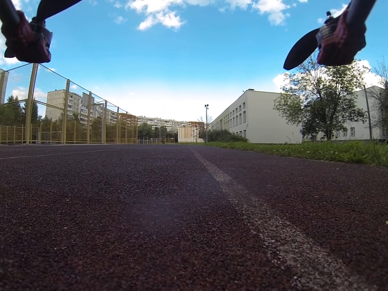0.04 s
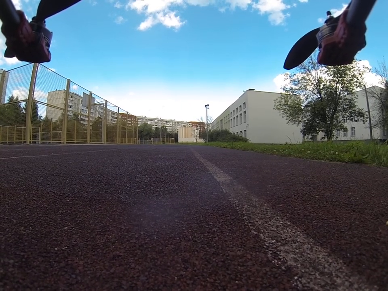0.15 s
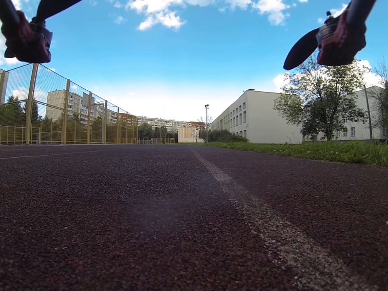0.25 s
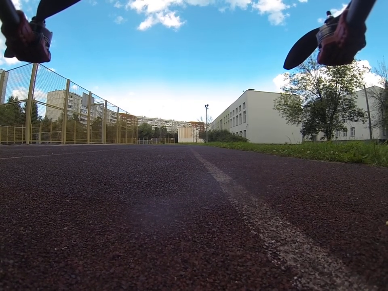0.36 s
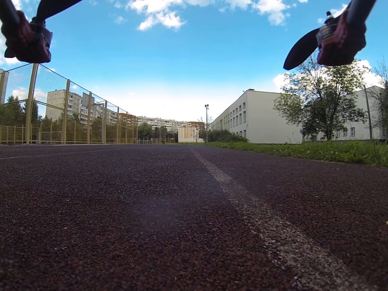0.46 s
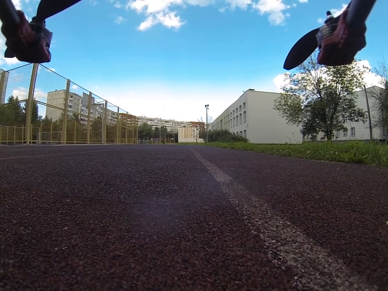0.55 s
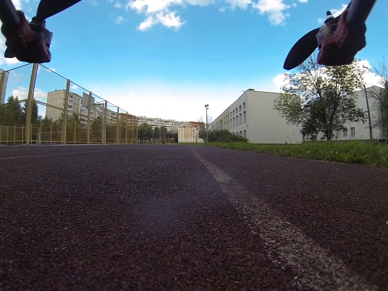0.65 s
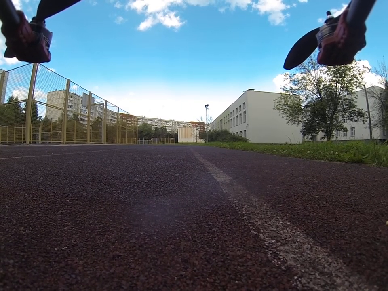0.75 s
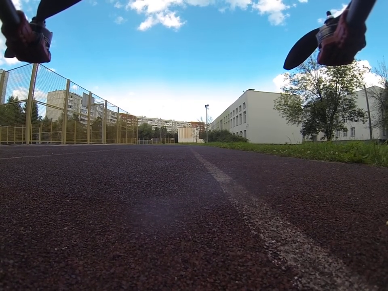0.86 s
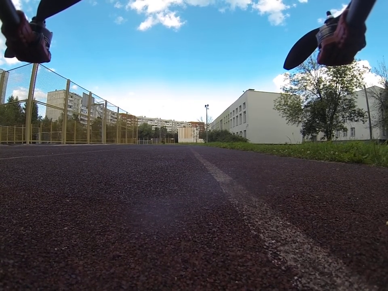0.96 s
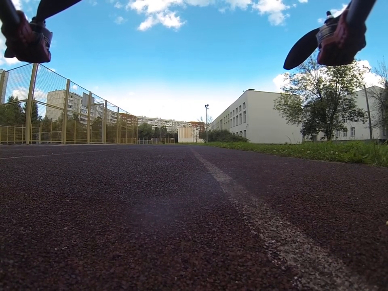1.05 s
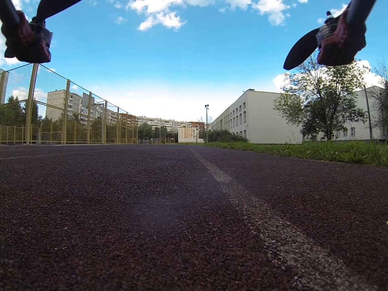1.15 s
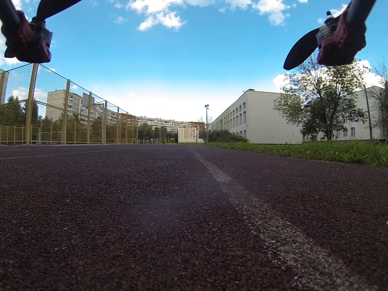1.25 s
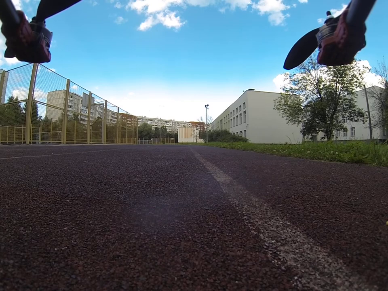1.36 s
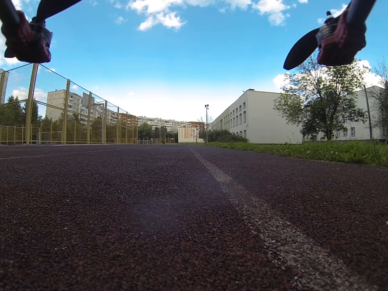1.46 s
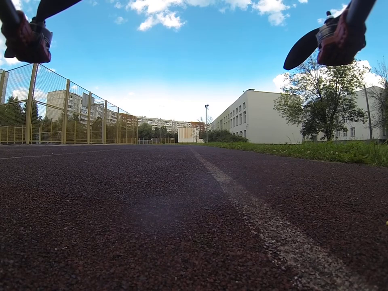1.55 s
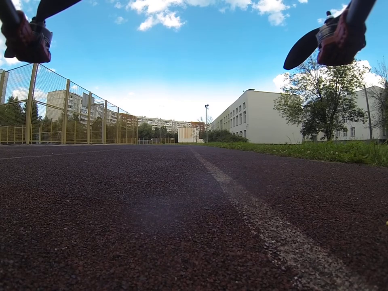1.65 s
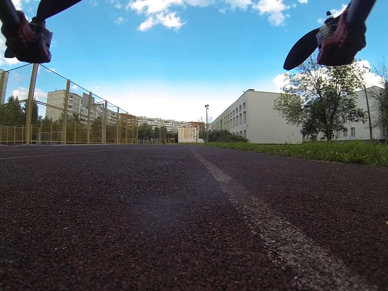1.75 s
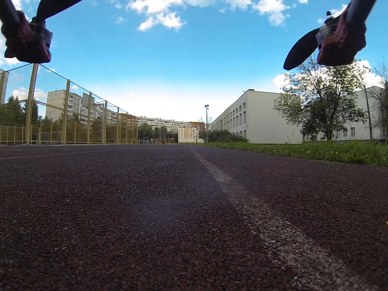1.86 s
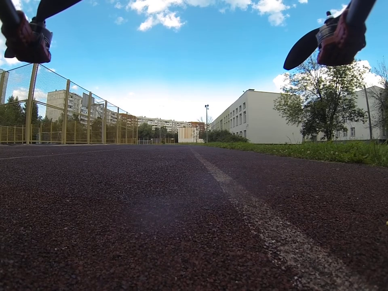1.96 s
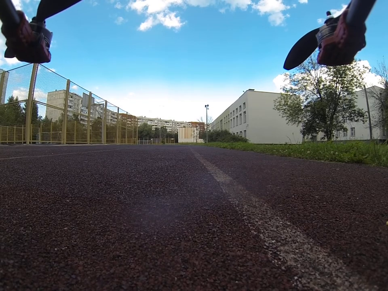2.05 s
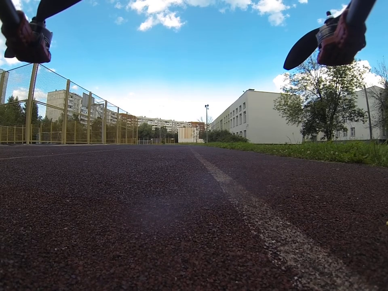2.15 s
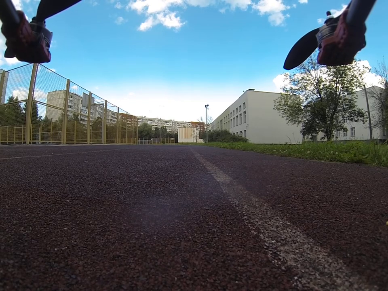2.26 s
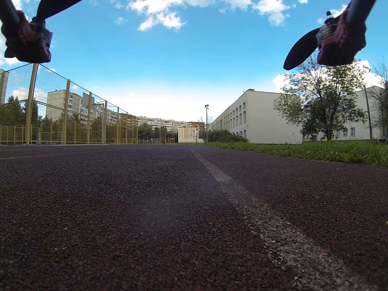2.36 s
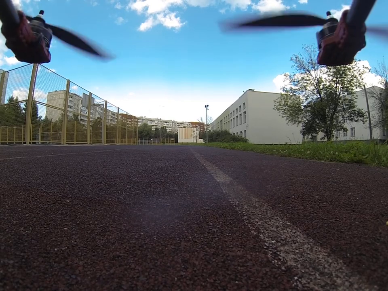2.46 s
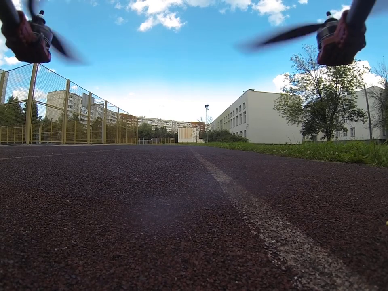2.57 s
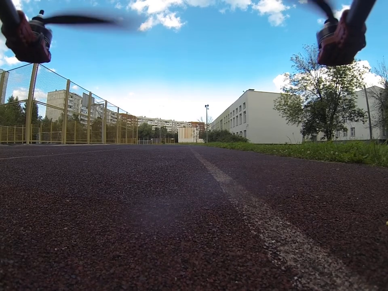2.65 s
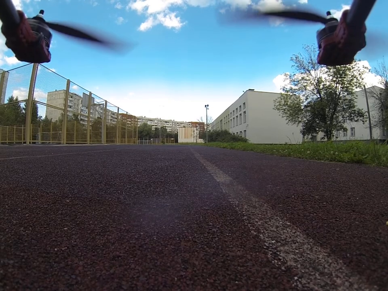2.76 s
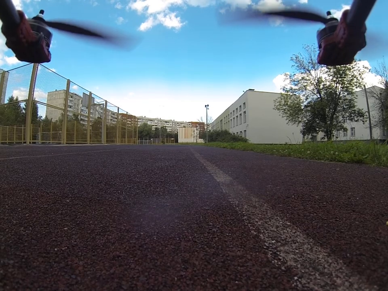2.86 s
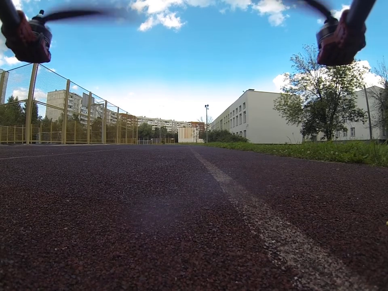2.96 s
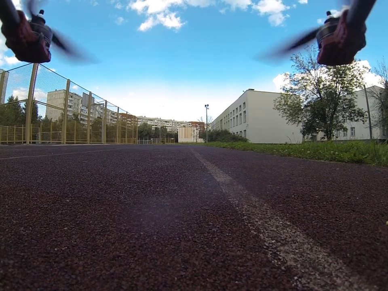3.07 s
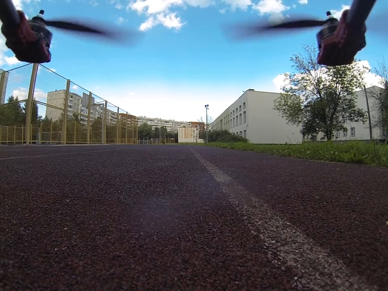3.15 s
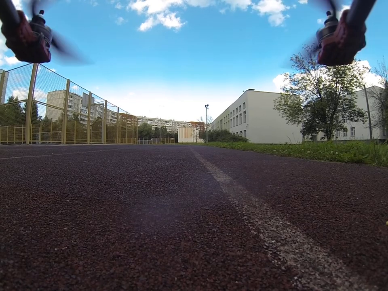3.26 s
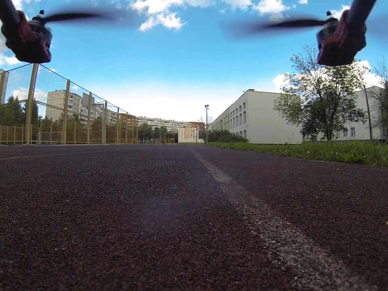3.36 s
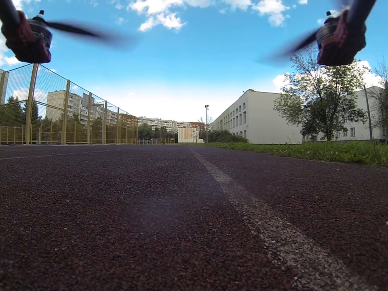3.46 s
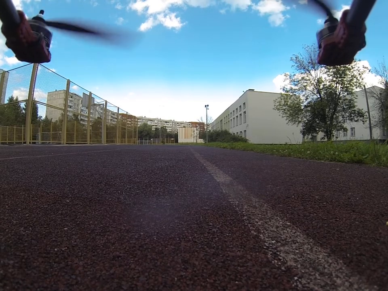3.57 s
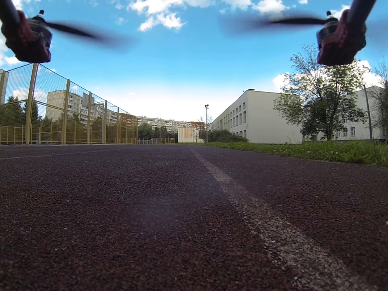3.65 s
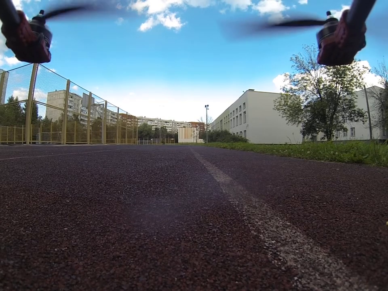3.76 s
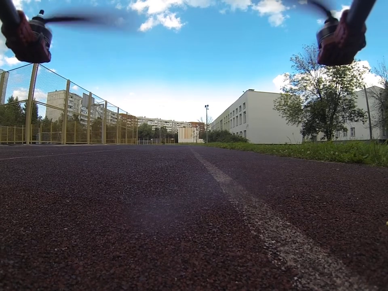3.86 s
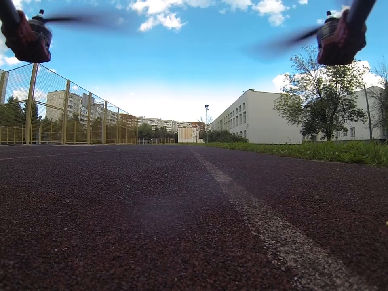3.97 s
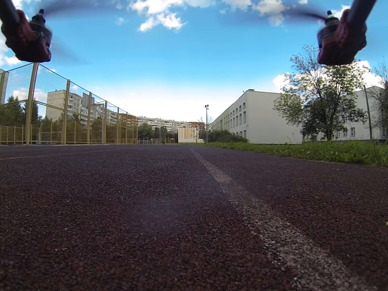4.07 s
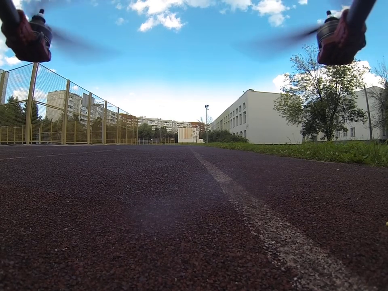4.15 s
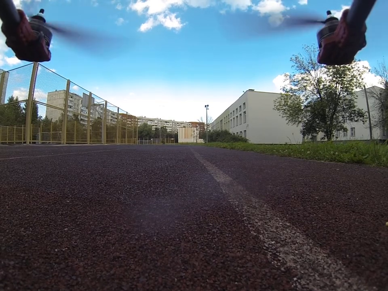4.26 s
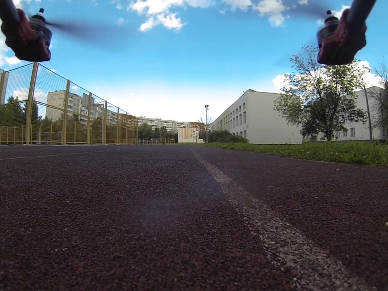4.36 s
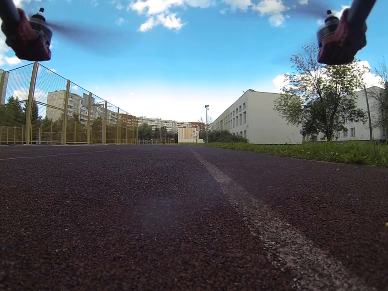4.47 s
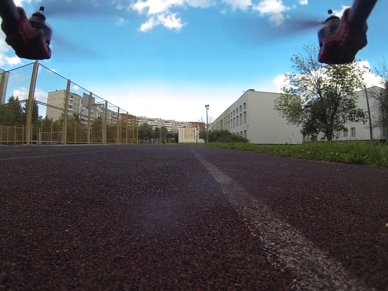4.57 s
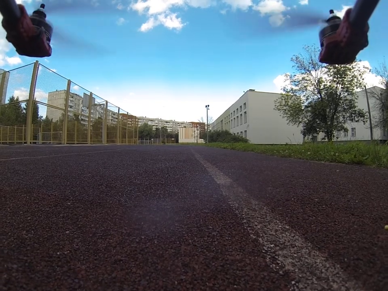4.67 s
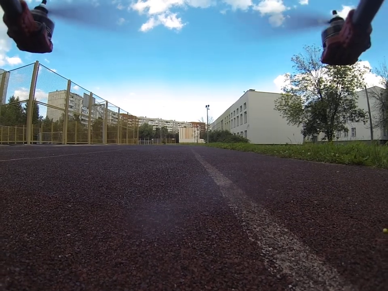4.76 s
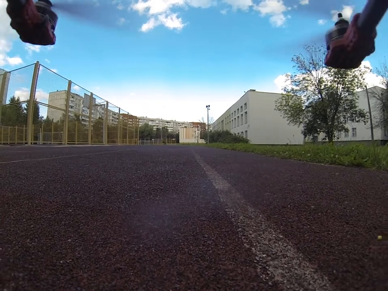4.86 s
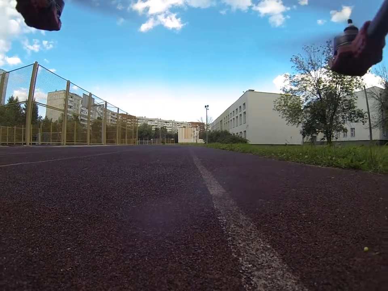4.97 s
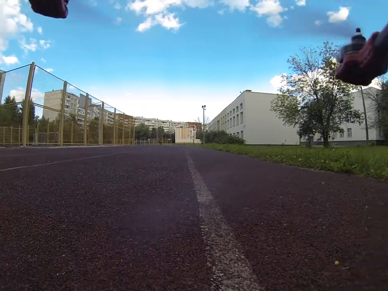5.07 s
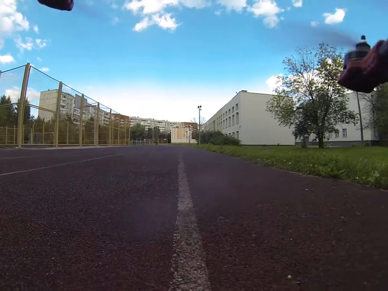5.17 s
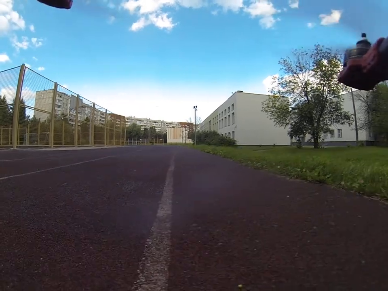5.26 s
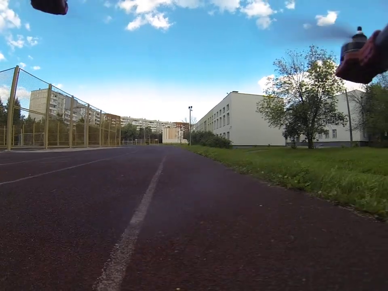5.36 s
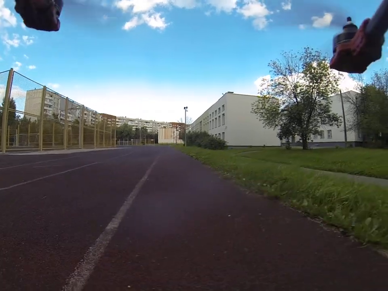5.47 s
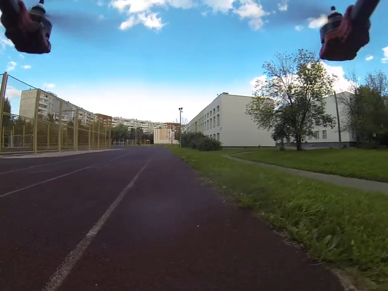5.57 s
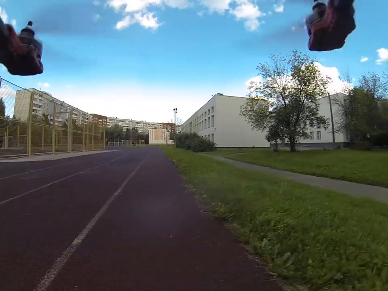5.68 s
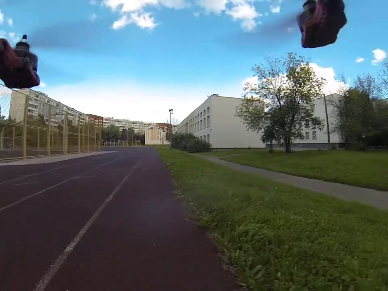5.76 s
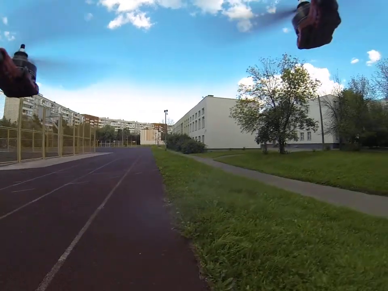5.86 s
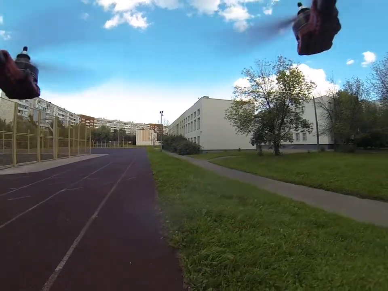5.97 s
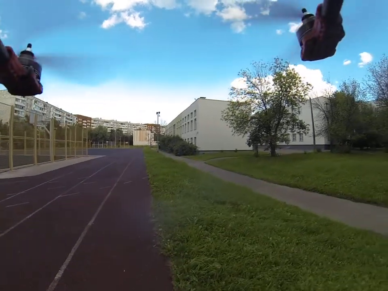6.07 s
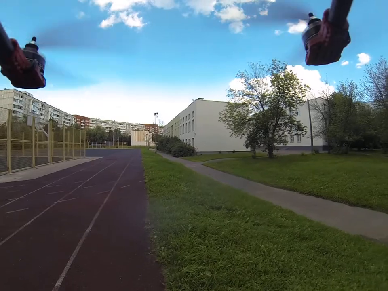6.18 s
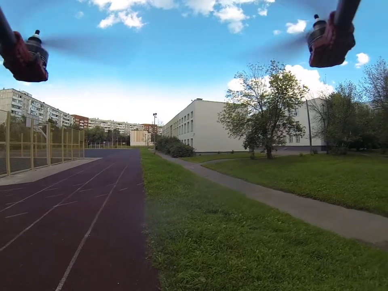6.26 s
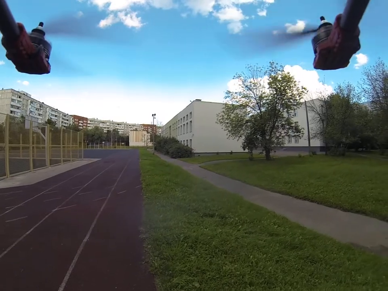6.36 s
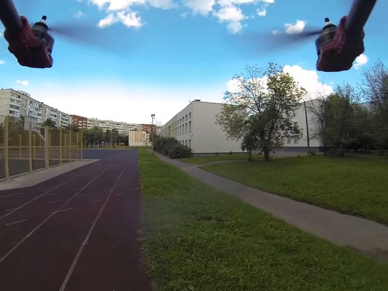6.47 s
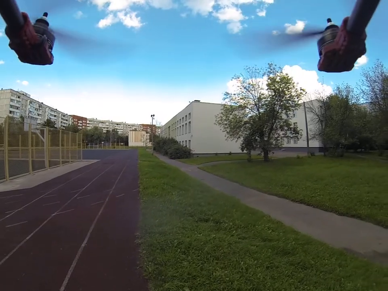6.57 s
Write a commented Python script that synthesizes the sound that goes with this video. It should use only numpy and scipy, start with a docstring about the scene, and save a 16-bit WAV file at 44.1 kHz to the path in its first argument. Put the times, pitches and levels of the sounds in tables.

```python
"""Motors jerk into life, whine at idle, glide upward and settle into a blade hum under a wide hiss.
A camera hangs under a six-rotor drone in a quiet town: the three loudest motors are sums of sines locked
to their shaft speeds, with filtered noise for bearings, spool-up and airflow. Downwash thrown back by the
ground is gusty rumble, flutter and slaps on the microphone, much of it fading as the drone lifts clear.
Steady town noise, thin pulsing electronic tones and a few dry rustles lie beneath."""
import sys
import numpy as np
from scipy import signal
from scipy.fft import rfft, irfft, next_fast_len
from scipy.io import wavfile
from scipy.ndimage import uniform_filter1d

SR = 44100
rng = np.random.default_rng(int(sys.argv[2]) if len(sys.argv) > 2 else 0)


def materialize(psi):
    """Save the field psi as 16-bit PCM at rate SR to the path in sys.argv[1].

    A 1-D psi becomes a single channel; in a 2-D psi each row is a channel.
    """
    bounded = np.clip(np.atleast_2d(psi).T, -1, 1)
    quanta = np.round(bounded * 32767).astype(np.int16)
    wavfile.write(sys.argv[1], SR, quanta)


N = 291942
T = np.arange(N) / SR
END_S = 7  # later than the last sample: a sound that lasts to the end
EDGE_HZ = 15220  # upper band limit


def gain_of(db):
    """Logarithmic level: 20 dB is a tenfold amplitude."""
    return np.exp(np.asarray(db) * (np.log(10) / 20))


def evened(x):
    """Power normalisation: scales a signal to rms 1."""
    return x / np.sqrt(np.mean(x ** 2) + 1e-20)


def read(points, hz):
    """Spectral envelope: interpolates a table's dB along log frequency."""
    f, value = np.transpose(points)
    return np.interp(np.log(hz + 1), np.log(f + 1), value)


def columns(rows):
    """Piecewise linear envelope: each column of a time table at every sample."""
    s, *rest = np.transpose(rows)
    return [np.interp(T, s, c) for c in rest]


def glides(rows):
    """Smooth envelope: each column as a cubic with continuous slope through its points."""
    s, *rest = np.transpose(rows)
    at = np.clip(np.searchsorted(s, T) - 1, 0, len(s) - 2)
    span = np.diff(s)[at]
    u = np.clip((T - s[at]) / span, 0, 1)
    ease = u * u * (3 - 2 * u)
    slopes = np.gradient(rest, s, axis=1)
    curves = []
    for c, m in zip(rest, slopes):
        bend = span * u * (1 - u) * ((1 - u) * m[at] - u * m[at + 1])
        curves.append(c[at] + ease * np.diff(c)[at] + bend)
    return curves


def during(t0, t1, fade=0.0017):
    """Gating: 1 between two times, 0 outside, with linear fades in seconds."""
    return np.clip(np.minimum(T - t0, t1 - T) / fade, 0, 1)


def colour(x, points):
    """Linear filtering: shapes the spectrum of x, keeping white noise near its rms."""
    size = next_fast_len(N)
    response = evened(gain_of(read(points, np.fft.rfftfreq(size, 1 / SR))))
    return irfft(rfft(x, size) * response, size)[:N]


def noise(points):
    """Coloured noise: a random signal with the given spectrum."""
    return colour(rng.standard_normal(N), points)


def wander(seconds, size=16):
    """Slow random modulation of rms 1: twice-smoothed noise, drawn once every size samples."""
    width = max(int(seconds * SR / size), 2)
    slow = uniform_filter1d(uniform_filter1d(rng.standard_normal(N // size + 2), width), width)
    return np.interp(np.arange(N) / size, np.arange(len(slow)), evened(slow))


# Far traffic and hiss. Each row: frequency in Hz, relative density in dB per Hz.
TOWN_SPECTRUM = [(8.8, -32), (15, -10.5), (66, -4.5), (95, -10.5), (208, -20), (270, -23), (295, -23.5),
                 (429, -28), (468, -23.5), (557, -30), (884, -27), (1400, -38.5), (1620, -43.5),
                 (1820, -47.5), (15000, -69)]
TOWN_DB = -36.5


def town():
    """Diffuse sound field: many far sources merge into steady coloured noise."""
    return gain_of(TOWN_DB) * noise(TOWN_SPECTRUM)


# Thin tones of the electronics. Each row: frequency in Hz, rms level before the pulsing in dB.
FAINT_TONES = [(5572, -87), (6428, -86), (12882, -84)]


def electronics():
    """Amplitude modulation: steady sines share one periodic pulse."""
    tones = sum(np.sqrt(2) * gain_of(db) * np.sin(2 * np.pi * hz * T) for hz, db in FAINT_TONES)
    pulse_hz = 47.9
    return tones * (1 + np.sin(2 * np.pi * pulse_hz * T))


# Faint dry rustles nearby. Each row: start in seconds, length in seconds, relative level in dB.
RUSTLE_TIMES = [(0.306, 0.021, -63), (1.089, 0.031, -59), (1.445, 0.085, -53), (1.676, 0.089, -56),
                (1.751, 0.047, -49), (2.145, 0.048, -57.5)]
# Their spectrum. Each row: frequency in Hz, relative density in dB per Hz.
RUSTLE_SPECTRUM = [(880, -2), (1500, -3), (3710, -12), (4860, -20), (5620, -13), (6820, -16.5),
                   (11300, -20), (15000, -24)]


def rustles():
    """Friction noise: short rough bursts, each swelling toward its end."""
    envelope = np.zeros(N)
    for s, length, db in RUSTLE_TIMES:
        swell = np.clip(0.73 + 0.81 * (T - s) / length, 0, 2)
        envelope += gain_of(db) * during(s, s + length, fade=0.0051) * swell
    return envelope * gain_of(3.0 * wander(0.0026)) * noise(RUSTLE_SPECTRUM)


# Gusts that buffet the microphone. Each row: centre in seconds, rumble level in dB,
# reach to either side in seconds.
GUST_TIMES = [(2.654, -12.5, 0.1), (2.734, -13.5, 0.14), (2.967, -12, 0.14), (3.191, -11, 0.05),
              (3.55, -9, 0.073), (3.615, -6, 0.051), (3.72, -15, 0.06), (4.34, -20, .11),
              (4.536, -4.5, 0.049), (4.648, -13, 0.092), (4.774, -14, 0.053), (4.877, -13, 0.072),
              (5.015, -7.5, 0.057)]


def gust_power():
    """Energy addition: gusts of raised-cosine amplitude add as powers."""
    power = np.zeros(N)
    for s, db, reach in GUST_TIMES:
        bump = np.cos(np.pi * np.clip((T - s) / reach, -1, 1) / 2) ** 2
        power += (gain_of(db) * bump) ** 2
    return power


# Eddies that slap the microphone port. Each row: start in seconds, relative level in dB,
# sharpness as relative treble level in dB.
SLAP_TIMES = [(2.602, -19.5, -34), (2.634, -11, -33), (2.667, -14, -38), (2.681, -13.5, -33),
              (2.699, -11, -32), (2.708, -12, -34), (2.775, -18.5, -31), (2.905, -15.5, -30),
              (2.917, -13, -31), (2.974, -15, -36), (3.023, -6, -28), (3.189, -22, -43), (3.245, -18, -47),
              (3.339, -25.5, -33), (3.545, -6.5, -22), (3.582, -9, -24), (3.593, -19, -9),
              (3.626, -17, -19), (3.639, -18.5, -8), (3.68, -9.5, -30), (3.709, -15, -14),
              (3.781, -18, -15), (3.806, -21, -12), (3.831, -15.5, -10.5), (3.847, -13.5, -15),
              (3.894, -18.5, -19), (3.917, -9, -20), (3.934, -9.5, -14), (3.988, -13, -11),
              (4.011, -14, -18), (4.042, -24, -26), (4.126, -11, -15.5), (4.138, -8.5, -15),
              (4.17, -15.5, -6), (4.202, -10, -3.5), (4.237, -21.5, -2), (4.276, -12.5, -5),
              (4.296, -13, -10), (4.447, -16.5, -13.5), (4.51, -16, -10.5), (4.517, -7.5, -11),
              (4.611, -18, -0.5), (4.65, -16.5, -11), (4.672, -13.5, -12.5), (4.704, -15.5, -15),
              (4.778, -13.5, -6.5), (4.79, -17, -17), (4.894, -20.5, -12), (4.928, -11.5, -9.5),
              (4.955, -13, -2.5), (4.991, -21, -19), (5.016, -12.5, -8), (5.062, -27, -1.5),
              (5.16, -21.5, -12)]
# Bass part of a slap. Each row: frequency in Hz, relative density in dB per Hz.
SLAP_BODY_SPECTRUM = [(30, 1.5), (150, 6), (400, -3), (800, -15), (1400, -53), (3000, -87)]
# Treble part of a slap. Each row: frequency in Hz, relative density in dB per Hz.
SLAP_EDGE_SPECTRUM = [(400, -37), (900, 1), (1800, -6.5), (3200, -18), (4500, -26.5), (7000, -60)]
SLAP_RISE_S = 0.0027


def slaps():
    """Impulsive turbulence: jagged pressure puffs drive a bass and a treble filter."""
    body, edge = np.zeros(N), np.zeros(N)
    # a few sudden steps in each slap
    jolts = evened(rng.standard_normal(N) * gain_of(3.5 * wander(0.00072, size=1)))
    u = T[:2000] / SLAP_RISE_S
    shape = (u * np.exp(1 - u)) ** 2.66
    for s, db, sharp_db in SLAP_TIMES:
        at = slice(round(s * SR), round(s * SR) + len(u))
        puff = shape * jolts[at]
        puff = gain_of(db) * puff * np.linalg.norm(shape) / np.linalg.norm(puff)
        body[at] += puff
        edge[at] += puff * gain_of(sharp_db)
    return gain_of(6.5) * colour(body, SLAP_BODY_SPECTRUM) + gain_of(1.0) * colour(edge, SLAP_EDGE_SPECTRUM)


# Downwash between gusts. Each row: time in seconds, relative rumble level in dB,
# flutter level in dB relative to the rumble.
WASH_LEVELS = [(2.3, -41, 3), (2.38, -37, -26), (2.54, -22.5, -28), (2.85, -16.5, -11), (3.02, -20.5, -9),
               (3.1, -24, -10), (3.48, -21, -4.5), (3.8, -12.5, -3.5), (4.2, -15, -9), (4.7, -21.5, -7),
               (5.05, -20.5, -6), (5.34, -19.5, -2.5), (5.75, -16.5, -19), (6.62, -16, -25)]
# Fading as the ground falls away: start in seconds, end in seconds, change of the rumble in dB.
LIFT_OFF = (4.56, 5.5, -10.5)
# Rumble spectrum. Each row: frequency in Hz, relative density in dB per Hz.
RUMBLE_SPECTRUM = [(8.8, -50), (15, 3), (57, 2.5), (260, -20.5), (340, -28), (570, -120)]
# Flutter spectrum. Each row: frequency in Hz, relative density in dB per Hz.
FLUTTER_SPECTRUM = [(60, -4.5), (120, -8.5), (310, -8), (600, -22), (1000, -59.5), (2000, -41), (4000, -81)]
# Sharper part of the flutter. Each row: frequency in Hz, relative density in dB per Hz.
CRACKLE_SPECTRUM = [(300, -7), (700, 0.5), (1300, -7), (2500, -19.5), (4500, -61)]
GUST_FLUTTER_DB = -12.5  # against the gust rumble


def downwash():
    """Wind noise: turbulence makes gusty rumble and clumped flutter, sharper at high rotor speed."""
    rumble_db, flutter_db = columns(WASH_LEVELS)
    gusts = gust_power()
    t0, t1, db = LIFT_OFF
    near_db = db * np.clip((T - t0) / (t1 - t0), 0, 1)

    rumble = evened(colour(rng.standard_normal(N) * gain_of(3.4 * wander(0.016)), RUMBLE_SPECTRUM))
    rumble *= gain_of(near_db) * np.sqrt(gain_of(rumble_db) ** 2 + gusts)

    lumpy_db = 5.64 * np.clip(1.5 + 0.073 * near_db, 0, 1)  # the flutter evens out away from the ground
    power_offset = lumpy_db * np.log(10) / 20  # keeps the mean power of the clumps about the same
    clumps = rng.standard_normal(N) * gain_of(lumpy_db * (wander(0.003) - power_offset))
    flutter_power = gain_of(rumble_db + flutter_db) ** 2 + gusts * gain_of(GUST_FLUTTER_DB) ** 2
    clumps *= gain_of(0.55 * near_db - 4.0) * np.sqrt(flutter_power)

    octaves = np.log2(columns(MOTOR_SPEEDS)[1] / 4000)  # second motor's whine
    sharp = gain_of(-8.0 + 0.14 * near_db + 13.6 * octaves)
    out = rumble + colour(clumps, FLUTTER_SPECTRUM) + colour(clumps * sharp, CRACKLE_SPECTRUM)
    return (out + slaps()) * during(WASH_LEVELS[0][0], END_S, fade=0.036)


# Motor and blade hiss following the throttle. Each row: time in seconds, relative level in dB.
HISS_LEVELS = [(2.32, -34), (2.35, -29.5), (2.43, -40), (2.65, -39.5), (2.81, -43.5), (3.0, -44.5),
               (3.7, -43), (3.9, -37), (4.13, -41), (4.39, -47), (4.51, -38.5), (4.94, -43.5), (5.31, -37),
               (6.43, -36), (6.62, -31)]
# Sudden drops of the hiss. Each row: start in seconds, depth in dB, recovery in seconds.
HISS_DIPS = [(3.006, 7.5, 0.43), (3.91, 5, 0.072), (4.01, 5.5, 0.17), (4.145, 9.5, 0.23), (4.54, 7.5, 0.42),
             (4.685, 4, 0.073), (4.785, 5.5, 0.084), (5.034, 10, 0.22)]
DIP_FALL_S = 0.01


def hiss_level():
    """Level envelope: the throttle curve in dB, with sudden dips that creep back."""
    dips = np.zeros(N)
    for s, db, back in HISS_DIPS:
        dips += db * during(s, END_S, DIP_FALL_S) * np.clip(1 - (T - s) / back, 0, 1)
    return columns(HISS_LEVELS)[0] - dips


# Bearings and windings at low speed. Each row: frequency in Hz, relative density in dB per Hz.
IDLE_SPECTRUM = [(500, 1.5), (1100, -9.5), (1700, 1.5), (2500, -4), (3500, -2.5), (4400, -0.5), (5100, -14),
                 (6500, -7.5), (8000, -12), (9300, -19), (10000, -15.5), (10500, -12), (12300, -9.5),
                 (13600, -17), (15300, -23)]
# Duller hiss under load near the ground. Each row: frequency in Hz, relative density in dB per Hz.
SPOOL_SPECTRUM = [(880, -1), (1500, -2), (2080, -7), (3860, -11.5), (4550, -12.5), (8190, -20),
                  (12400, -22), (15000, -31)]
# Blade tips and wake. Each row: frequency in Hz, relative density in dB per Hz.
AIRFLOW_SPECTRUM = [(240, -5), (400, -22), (432, 1), (593, -5), (712, -1.5), (1270, 0.5), (2090, -3.5),
                    (2880, -2.5), (3250, -5), (4330, -4.5), (8840, -8), (12200, -7.5), (15000, -15)]


def rotor_hiss(hiss_db, throb):
    """Broadband rotor noise: bearing hiss yields to airflow, both throbbing with the passing blades."""
    load = np.clip((columns(MOTOR_SPEEDS)[1] - 2600) / 1200, 0, 1)  # from the second motor's whine
    airflow = np.clip((T - 4.9) / 0.58, 0, 1)  # clean air reaches the blades as the craft rises
    idle = gain_of(1.0 + 0.18 * throb) * noise(IDLE_SPECTRUM)
    air = gain_of(3.0 + 0.87 * throb) * noise(AIRFLOW_SPECTRUM)
    spool = gain_of(5.5) * noise(SPOOL_SPECTRUM)
    # square roots keep the power even across each blend
    near_ground = np.sqrt(1 - load) * idle + np.sqrt(load) * spool
    hiss = np.sqrt(1 - airflow) * near_ground + np.sqrt(airflow) * air
    gate = during(FIRST_JERK[0] - 0.008, END_S, fade=0.0046)
    return gain_of(hiss_db + 1.1 * wander(0.0025)) * hiss * gate


# Rattle of arms and motor bells. Each row: frequency in Hz, relative density in dB per Hz.
ARM_SPECTRUM = [(500, -24), (1100, -22), (1650, -7.5), (2500, -37), (3400, -3), (4400, -12), (5100, -27.5),
                (6500, -19.5), (8000, -45), (9500, -70), (10500, -51), (12000, -61), (13500, -50),
                (15300, -43)]
# First jerk of the rotors: start in seconds, level in dB, time to decay by 60 dB in seconds.
FIRST_JERK = (2.311, -20, 0.029)
# A later swell of the rattle: three times in seconds and a relative peak level in dB; the times are out of
# order, so the swell stays silent.
RATTLE_GATE = (2.5, 2.365, 2.5, -30)


def start_rattle():
    """Structural excitation: one rattling noise rings down exponentially after the first jerk; the later swell
    stays silent."""
    rattle = noise(ARM_SPECTRUM)
    s, db, t60 = FIRST_JERK
    jerk = gain_of(db - 60 * np.maximum(T - s, 0) / t60) * during(s, END_S, fade=0.0011)
    swell = np.interp(T, RATTLE_GATE[:3], [0, 1, 0]) ** 2
    grind = gain_of(RATTLE_GATE[3] + 1.4 * wander(0.0048)) * swell
    return rattle * (jerk + grind)


def start_tone():
    """Electromagnetic excitation: windings sing while the rotors are pulled into step."""
    level = np.sqrt(2) * gain_of(-37.5 + 2 * wander(0.0043))
    return level * np.sin(2 * np.pi * 9154 * T) * during(2.311, 2.422)


def ringing(hz, arms, bells, size=32):
    """Resonance: how much arms and motor bells lift a gliding tone, in dB."""
    slow = abs(hz[::size])
    lift_db = arms * read(ARM_SPECTRUM, slow) + bells * read(IDLE_SPECTRUM, slow)
    return np.repeat(lift_db, size)[:N]


# Magnet and slot tones in the order of SLOT_ORDERS. Each row: relative level at idle in dB,
# relative level in flight in dB, both against the hiss.
SLOT_LEVELS = [(-19, 0.5), (-23, 4), (-7.5, -5), (-9, -26), (-6.5, 5.5), (0, 15), (-28, 7), (-7.5, -17),
               (-6, -14), (-7, -22), (-5.5, -26), (-6, -22), (-3, -16), (0, -11)]
# Their multiples of the shaft speed, one number each.
SLOT_ORDERS = [24, 36, 48, 54, 108, 144, 168, 180, 216, 252, 288, 324, 360, 396]
# Whine folded down from the switching frequency. Each row: multiple of the whine,
# relative level against the hiss in dB.
FOLDED_WHINES = [(1, -21), (2, -23), (3, -24)]
SWITCH_HZ = 16640  # the speed controllers chop the current at this rate
WHINE_ORDER = 72  # magnet whine per shaft turn


def motor(whine_hz, whine_db, beat_db, blades, near, hiss_db):
    """Harmonic synthesis: sines on multiples of shaft speed; the high ones waver and ring in the arms."""
    near_idle_db, near_flight_db, near_fold_db = near
    turn = 2 * np.pi * np.cumsum(whine_hz / WHINE_ORDER) / SR  # shaft angle in radians
    load = np.clip((whine_hz - 2200) / 2500, 0, 1)

    level_db = hiss_db + whine_db + 0.5 + ringing(whine_hz, 0.15, 0.25)
    out = gain_of(level_db + 1.8 * wander(0.012)) * np.sin(WHINE_ORDER * turn + 0.4 * wander(0.006))

    for k, db in blades:
        level = gain_of(beat_db + db + wander(0.03)) * during(BLADE_LEVELS[0][0], END_S, fade=0.3)
        out += level * np.sin(k * turn + 2 * np.pi * rng.random())

    for k, (idle_db, flight_db) in zip(SLOT_ORDERS, SLOT_LEVELS):
        hz = k * whine_hz / WHINE_ORDER
        own_db = (1 - load) * (idle_db + near_idle_db) + load * (flight_db + near_flight_db)
        level_db = hiss_db + own_db + 1.0 + ringing(hz, 0.51, 0.47) + 2 * wander(0.012)
        level = (hz < EDGE_HZ) * gain_of(level_db)
        out += level * np.sin(k * turn + 0.4 * wander(0.008))

    for k, db in FOLDED_WHINES:
        ring_db = ringing(SWITCH_HZ - k * whine_hz, 0, 0.94)
        level_db = hiss_db + db + near_fold_db + 7.5 + ring_db - 23 * load + 2.1 * wander(0.03)
        phase = 2 * np.pi * SWITCH_HZ * T - k * WHINE_ORDER * turn
        out += gain_of(level_db) * np.sin(phase + 0.6 * wander(0.004))
    return np.sqrt(2) * out * during(MOTOR_SPEEDS[0][0], END_S, fade=0.05), turn


# The three loudest motors. Each row: time in seconds, then the magnet whine of each motor in Hz,
# which is 72 times its shaft speed.
MOTOR_SPEEDS = [(2.345, 680, 660, 640), (2.39, 1060, 1040, 1015), (2.43, 1295, 1280, 1260),
                (2.5, 1468, 1461, 1456), (2.63, 1650, 1642, 1637), (2.82, 1803, 1812, 1789),
                (3.1, 1913, 1913, 1890), (3.3, 1960, 1965, 1936), (3.6, 2037, 2170, 2012),
                (3.72, 2128, 2305, 2115), (3.8, 2305, 2569, 2355), (3.95, 2753, 3197, 2931),
                (4.22, 3427, 4120, 3778), (4.42, 3871, 4627, 4158), (4.62, 4192, 4993, 4541),
                (4.82, 4745, 5272, 4951), (4.92, 5193, 5375, 5157), (5.12, 5604, 5404, 5567),
                (5.37, 6077, 5260, 5998), (5.62, 6375, 4846, 5949), (5.82, 6235, 4472, 5693),
                (6.12, 5571, 4053, 5301), (6.32, 5125, 3802, 5105), (6.42, 5077, 3790, 5086),
                (6.62, 5149, 3896, 5122)]
# Each row: time in seconds, then the relative whine level of each motor against the hiss in dB.
WHINE_LEVELS = [(2.4, -6, -20, -18), (2.65, 2.5, -23, 5), (2.95, 1, -15, -2.5), (3.3, -2.5, -4, 1),
                (3.52, 6, -3, -15), (3.8, -2, -2.5, -21), (4.0, -12, 4.5, 0), (4.36, -1, 5.5, -6),
                (4.6, -13, -16, -13), (5.06, -9, -13, -26), (5.6, -1, -19, -9), (6.1, -1, -12.5, -8),
                (6.46, 0, -3.5, -13)]
# Blade tones, heard once the rumble clears. Each row: time in seconds, then the relative level
# for each motor in dB.
BLADE_LEVELS = [(5.05, -13, -35, -39), (5.2, -15, -21, -38), (5.3, -37, -17, -47),
                (5.45, -24.5, -19.5, -36), (5.7, -20, -21, -40), (6.15, -21, -21.5, -37),
                (6.35, -28, -19.5, -27), (6.62, -27, -18.5, -25)]
# Shaft wobble and the beat of two blades, one list per motor. Each row: multiple of the shaft speed,
# relative level in dB.
BLADE_ORDERS = [
    [(1, -8), (2, 0), (4, -17.5), (6, -29), (8, -28.5), (12, -25)],
    [(1, -0.5), (2, 0.5), (3, -32), (4, -14.5), (6, -30), (8, -31.5)],
    [(1, -5), (2, 9.5), (4, -13), (6, -51), (8, -35)],
]
# Weight of each motor's tones. Each row: change at idle, in flight and for the folded whine, all in dB.
MOTOR_NEARNESS = [(-5, -4.5, 6), (4, -8, -3), (-3, -11.5, -8)]


def drone():
    """Superposition: motor tones, a hiss modulated at twice the shaft speeds, and starting noises."""
    hiss_db = hiss_level()
    out, throb = np.zeros(N), np.zeros(N)
    curves = zip(glides(MOTOR_SPEEDS), columns(WHINE_LEVELS), columns(BLADE_LEVELS),
                 BLADE_ORDERS, MOTOR_NEARNESS)
    for parts in curves:
        tones, turn = motor(*parts, hiss_db)
        out += tones
        throb += np.cos(2 * turn)  # two blades pass in each turn
    return out + rotor_hiss(hiss_db, throb) + start_rattle() + start_tone()


def scene():
    """Superposition: the place, the wind on the microphone and the drone add linearly."""
    surroundings = town() + electronics() + rustles()
    return (surroundings + downwash() + drone())[None]


def record(dry):
    """Saturation and band limiting: soft overload, then a linear-phase low-pass."""
    held = 0.97 * np.tanh(dry / 0.97)
    taps = signal.firwin(1023, EDGE_HZ, window=("kaiser", 9), fs=SR)
    return signal.oaconvolve(held, taps[None], "same")


dry = scene()
out = record(dry)
materialize(out)
```